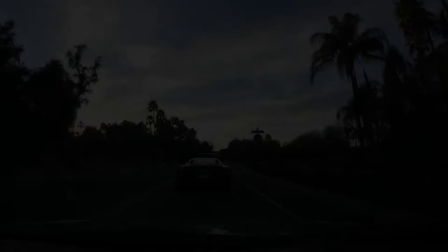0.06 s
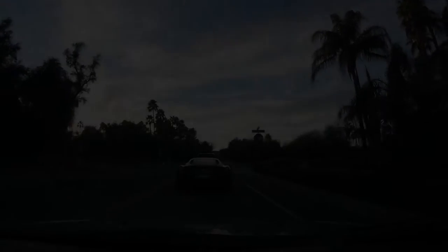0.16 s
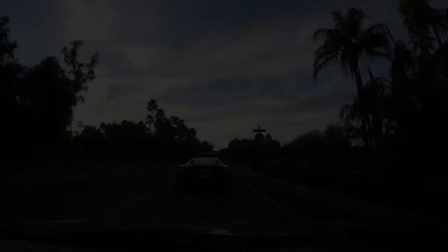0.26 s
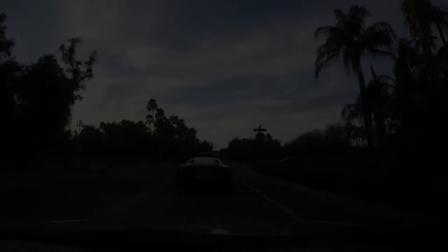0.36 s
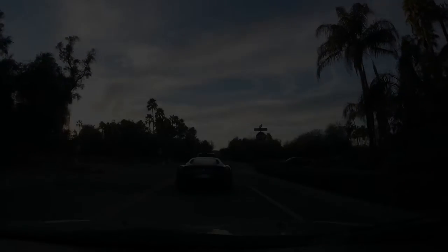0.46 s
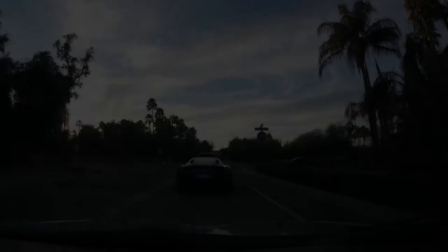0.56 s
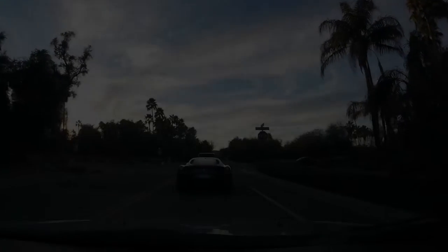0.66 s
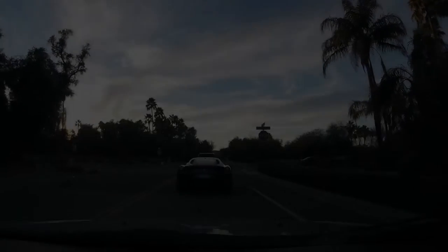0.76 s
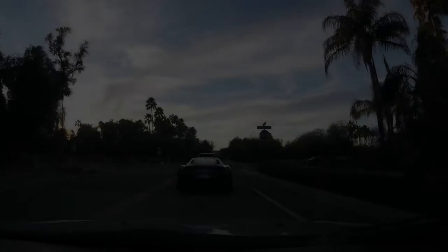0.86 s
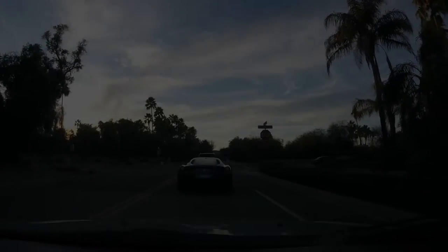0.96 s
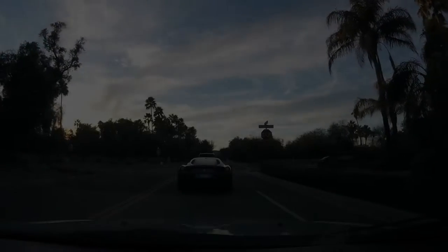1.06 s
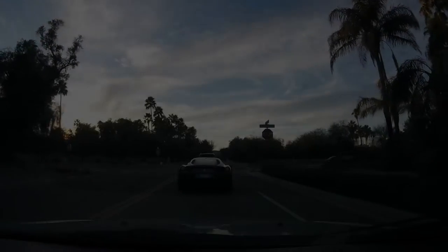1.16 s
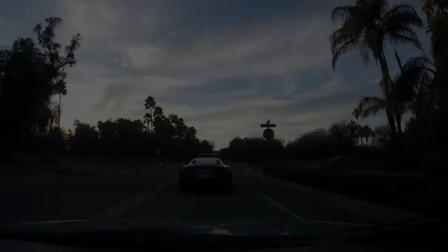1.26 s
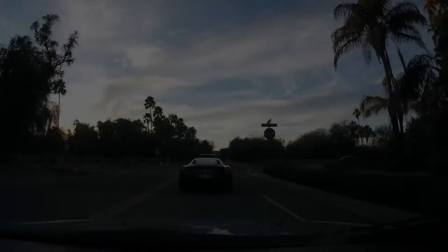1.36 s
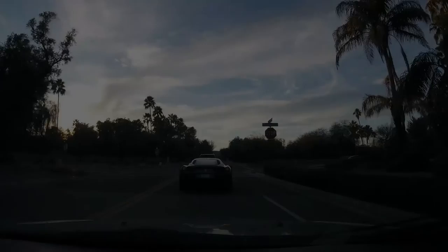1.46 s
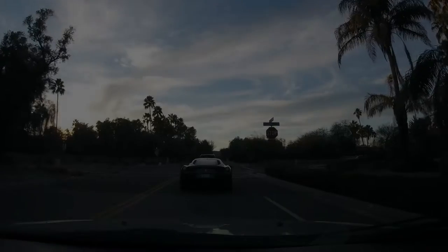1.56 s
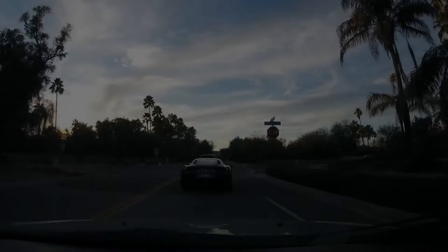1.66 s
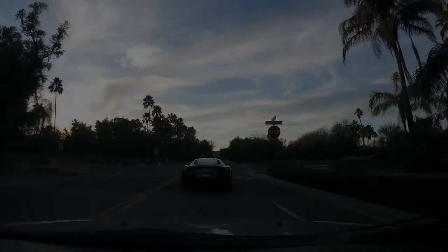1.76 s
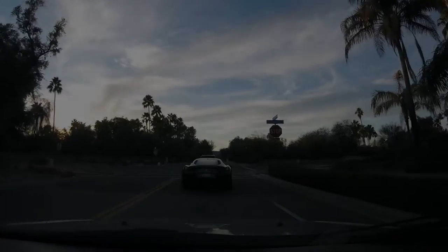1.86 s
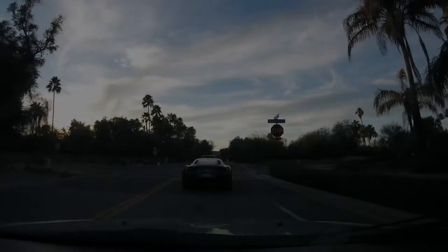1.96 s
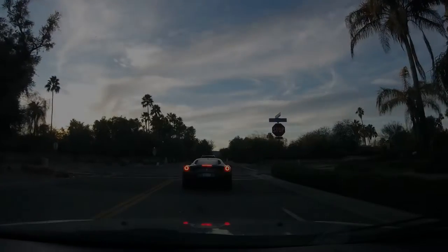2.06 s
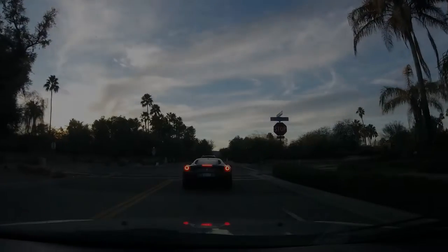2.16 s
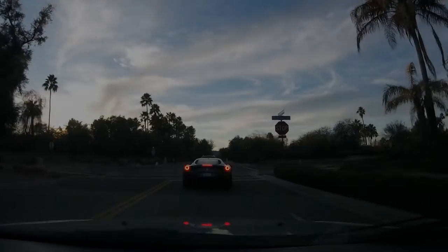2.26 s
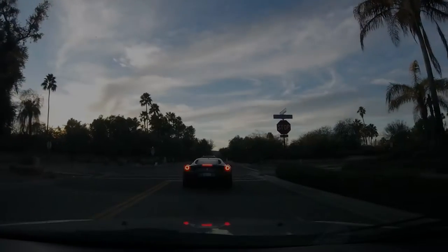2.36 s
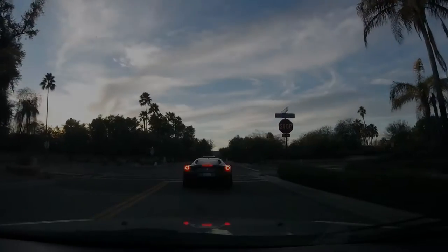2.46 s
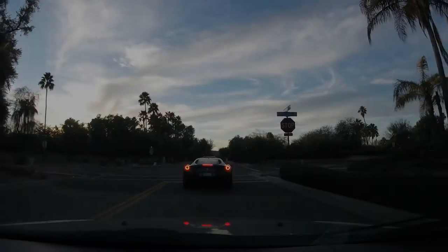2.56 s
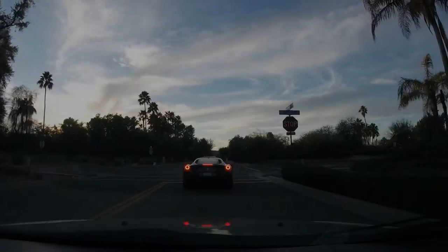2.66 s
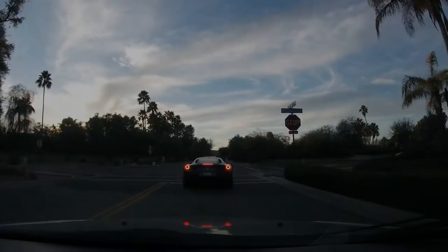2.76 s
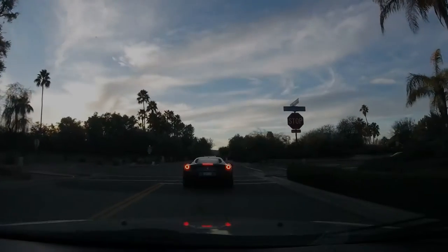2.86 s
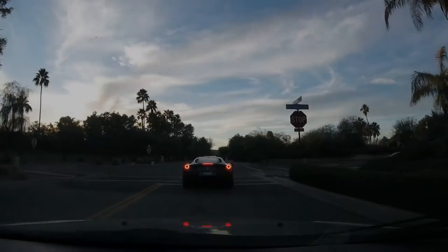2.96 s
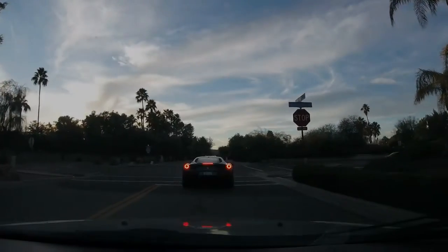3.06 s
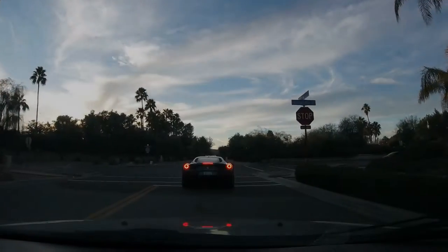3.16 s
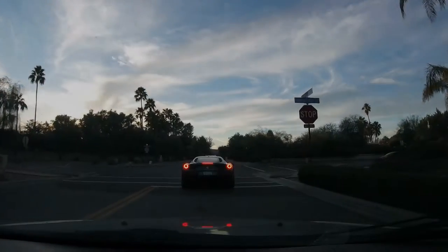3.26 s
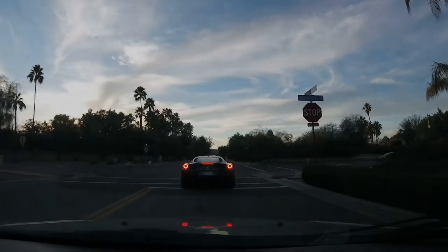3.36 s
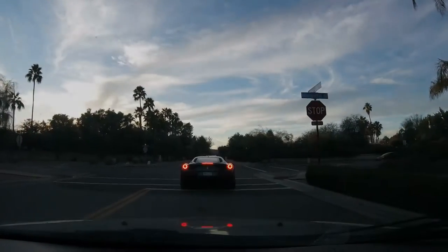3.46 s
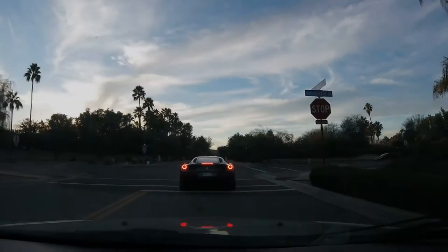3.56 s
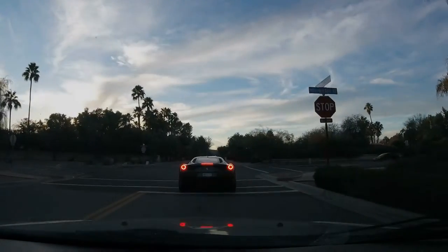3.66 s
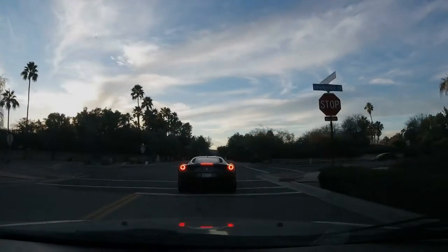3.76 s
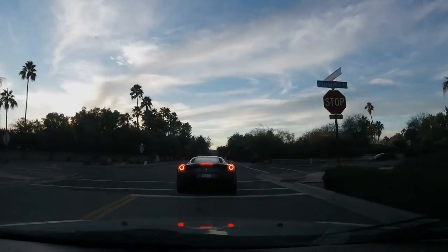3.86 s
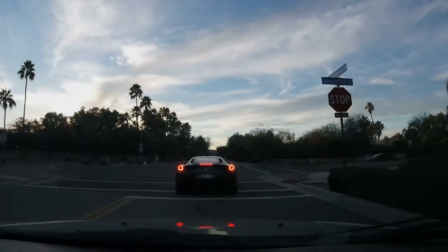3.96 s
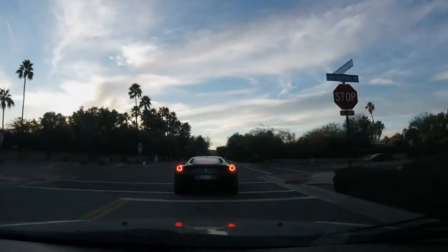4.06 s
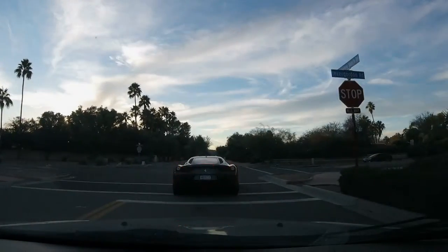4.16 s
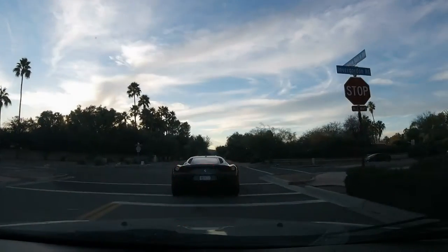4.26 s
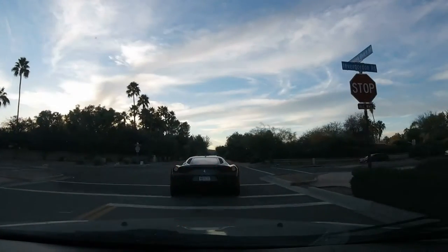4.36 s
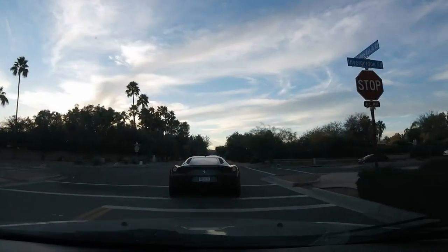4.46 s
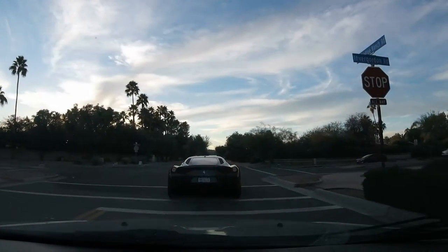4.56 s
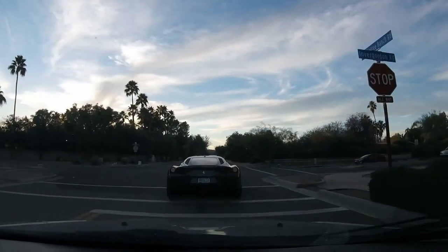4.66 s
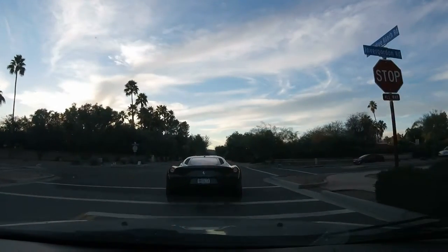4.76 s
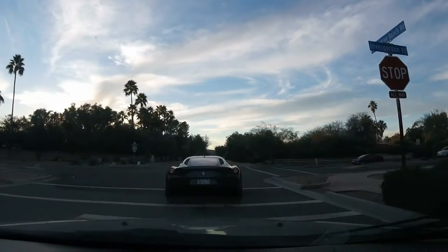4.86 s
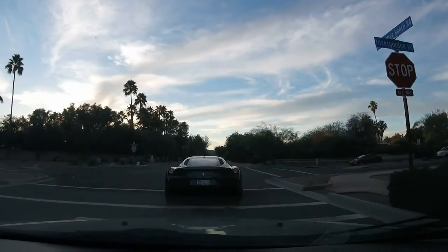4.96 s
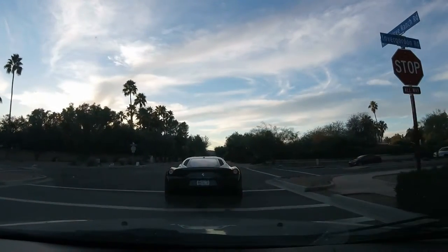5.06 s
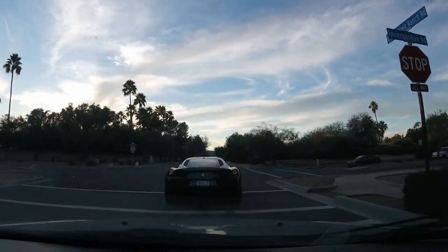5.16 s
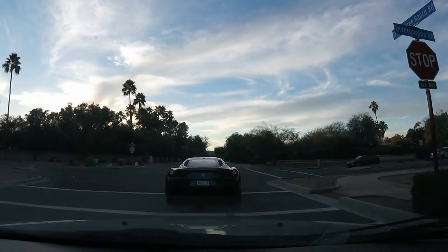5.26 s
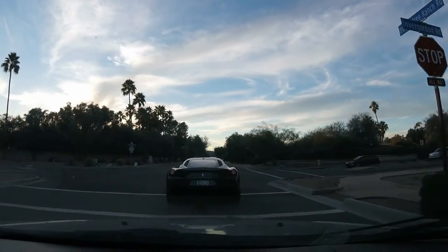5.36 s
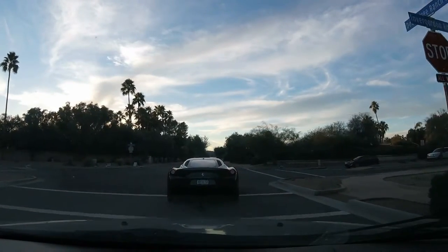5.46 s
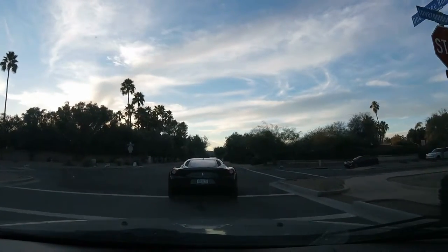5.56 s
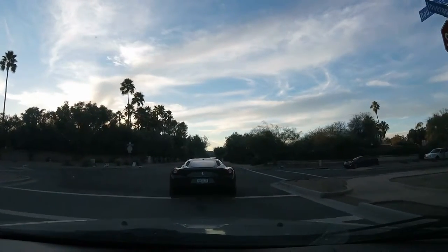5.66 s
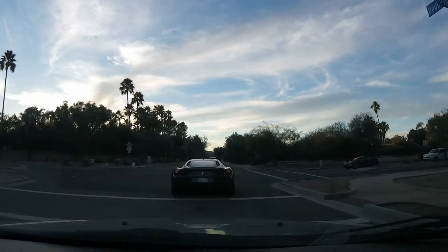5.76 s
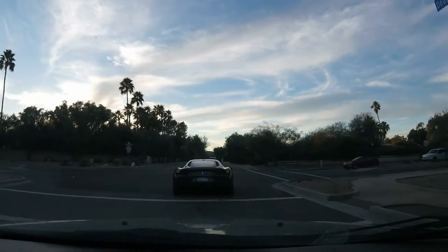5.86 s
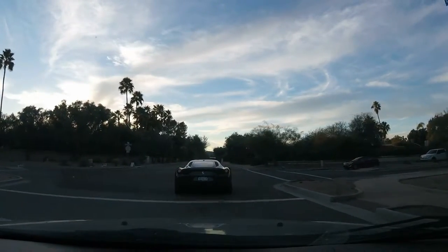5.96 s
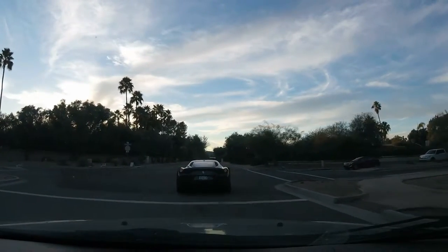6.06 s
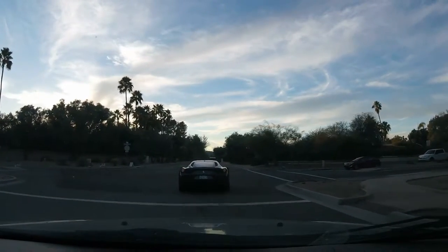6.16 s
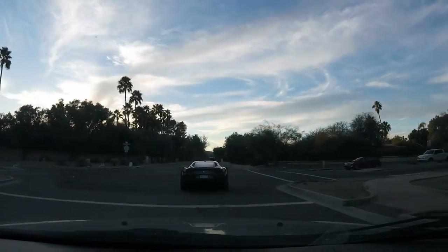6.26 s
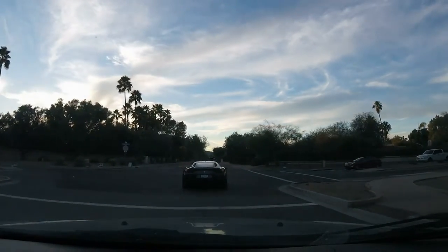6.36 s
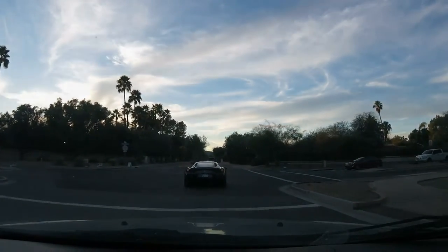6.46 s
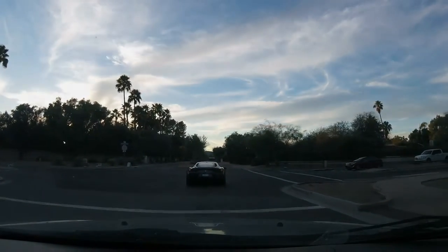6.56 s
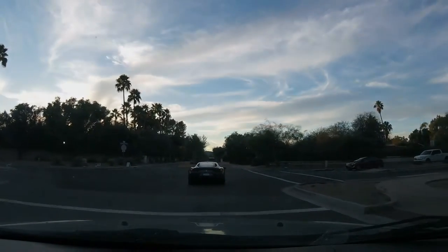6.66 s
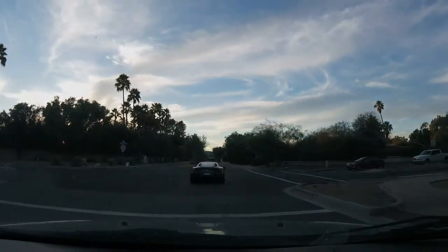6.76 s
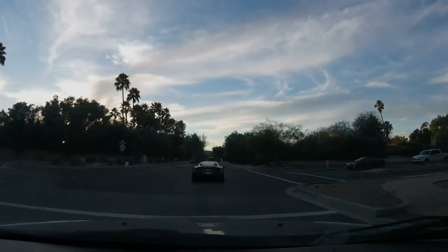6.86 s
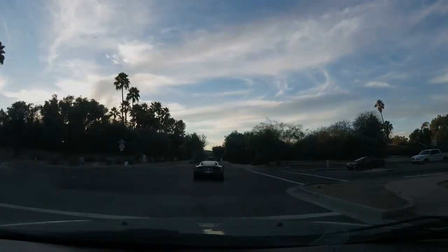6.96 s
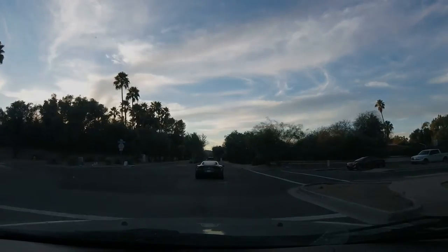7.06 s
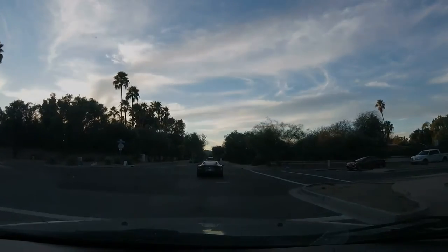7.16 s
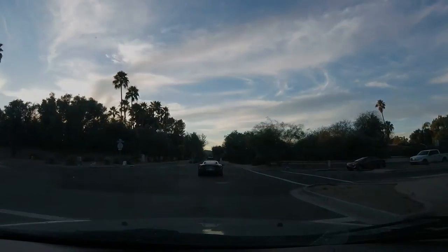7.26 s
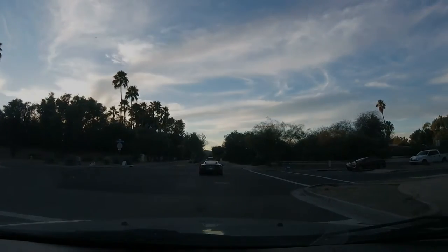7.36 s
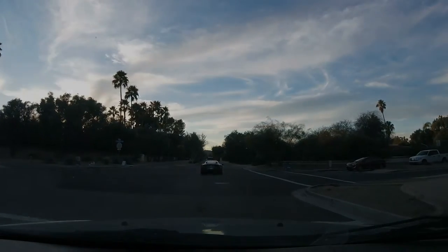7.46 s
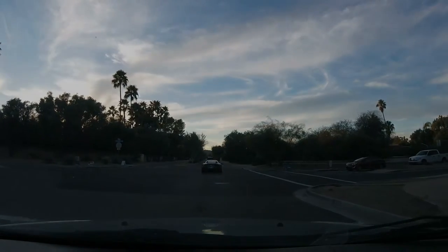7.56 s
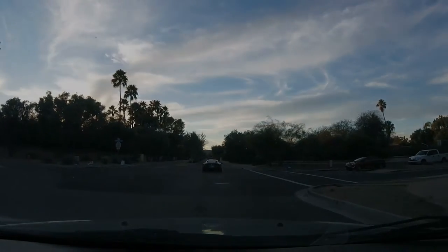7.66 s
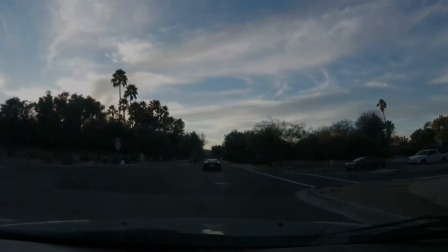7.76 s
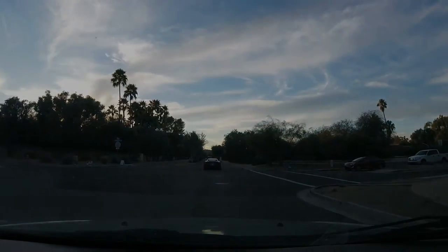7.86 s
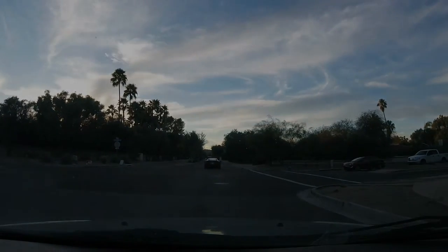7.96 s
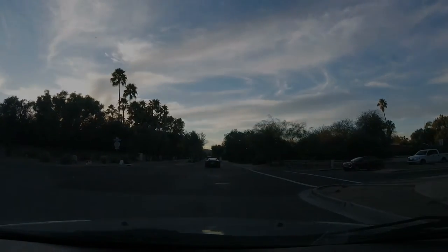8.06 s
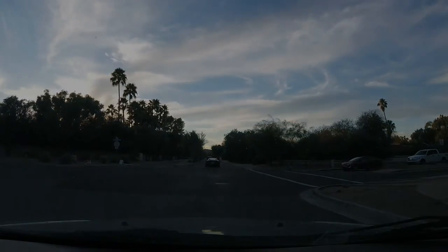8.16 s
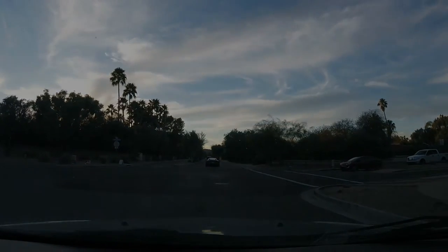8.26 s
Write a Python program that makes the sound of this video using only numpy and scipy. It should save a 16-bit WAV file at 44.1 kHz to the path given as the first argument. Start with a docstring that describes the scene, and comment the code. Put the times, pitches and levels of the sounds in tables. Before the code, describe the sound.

A cabin microphone picks up body shake, tyre roar and thin hiss beneath a throaty engine. It approaches a junction with a gentle rise, coasts down to a low idle, then accelerates hard after two small clicks. The growl sweeps up more than two octaves, with buzzing panels and brief resonant flares, eases for a moment late on, then pushes upward again.

```python
"""Sports car pulling away

From the cabin, a sports car rolls up to a junction, drops to idle and pulls away hard, easing once near the
end. Its eight-cylinder engine is a sum of sine orders of the cycle rate, coloured by resonances, with pulsed
gas noise. Filtered noise gives body shake, road rumble, tyre roar, a tyre rush at the start and a thin hiss.
Low sines boom, brief narrow tones chirp and flare, and two sharp ticks sound close together at about 5.1 s. The
whole fades in, and a gain control turns it down when it is loud."""
import sys
import numpy as np
from scipy import signal
from scipy.fft import rfft, irfft, next_fast_len
from scipy.io import wavfile
from scipy.ndimage import uniform_filter1d

SR = 44100
rng = np.random.default_rng(int(sys.argv[2]) if len(sys.argv) > 2 else 0)


def persist_wave(psi):
    """Save psi, clipped to +-1, as 16-bit WAV."""
    counts = np.round(np.clip(psi, -1, 1) * 32767).astype(np.int16)
    wavfile.write(sys.argv[1], SR, np.atleast_2d(counts).T)


N = 367353
TIME = np.arange(N) / SR

# nominal engine speed: t/s, firing rate f/Hz
SPEED = [(0, 83), (.25, 86), (.85, 98), (1.45, 116), (1.75, 124.5), (2.25, 122), (2.5, 116), (2.9, 100),
         (3.1, 88), (3.25, 83), (3.45, 72.5), (4.44, 70), (4.68, 102), (4.92, 114), (5.05, 115.5),
         (5.2, 130), (5.42, 138), (5.59, 136), (5.87, 175), (6.06, 198), (6.11, 212), (6.27, 245),
         (6.55, 294), (6.69, 316), (6.76, 321), (6.81, 337), (6.93, 355), (7.15, 385), (7.38, 411),
         (7.44, 382), (7.55, 343), (7.71, 330), (7.86, 338), (8.25, 393), (8.33, 396)]
# a touch of throttle, coasting to idle, the hard pull and one lift: t/s, load level/dB re reference load
THROTTLE = [(0, -18), (1.15, -22), (1.9, -7), (2.3, -12), (2.6, -22.5), (3.15, -19.5), (4.45, -19),
            (4.72, -12), (4.95, -2.5), (5.3, 2.5), (5.85, 3), (6.4, 4), (7.05, 1), (7.38, 2.5), (7.65, -1),
            (8.05, -3.5), (8.22, 2)]
# leading exhaust notes as multiples of the cycle rate: 4 is the note of one bank, 8 the firing note
LEADING_ORDERS = [4, 8, 12, 16, 20, 24, 32]


def from_db(db):
    """Logarithmic level: 20 dB is a factor of ten in amplitude."""
    return 10 ** (np.asarray(db) / 20)


def rms_one(x):
    """Normalisation: scale the signal to unit rms."""
    return x / np.sqrt(np.mean(x ** 2) + 1e-20)


def in_time(rows, t=TIME):
    """Linear interpolation: the columns of a curve at the times t."""
    s, *columns = np.transpose(rows)
    return [np.interp(t, s, column) for column in columns]


def at_hz(points, hz):
    """Spectral envelope: levels in dB interpolated along a log-frequency axis."""
    f, db = np.transpose(points)
    return np.interp(np.log(hz), np.log(f), db)


def drift(rate, t=TIME):
    """Slow random modulation: white noise through a double one-pole low-pass near rate in Hz; rms 1."""
    r = np.exp(-2 * np.pi * rate / 1000)  # drawn at 1000 values per second
    white = rng.standard_normal(10500)
    slow = signal.lfilter([1], [1, -2 * r, r * r], white)[2000:]  # the settling is dropped
    return np.interp(t * 1000, np.arange(len(slow)), rms_one(slow))


def resonance_db(hz):
    """Resonance: a component rises or dips as its frequency sweeps through each bell-shaped peak."""
    # broad resonances of the path into the cabin: f/Hz, width/Hz, level/dB
    broad_peaks = [(168, 63, 12), (305, 17, 7.5), (390, 38, 6.5), (558, 38, 9), (616, 42, 4),
                   (774, 12, 2.5), (930, 81, 4), (1340, 30, -3.5)]
    return sum(db / (1 + (2 * (hz - centre) / width) ** 2) for centre, width, db in broad_peaks)


def noise(spectrum, resonant=0):
    """Spectral shaping: white noise filtered to a colour, plus a share of the cabin's resonances; rms 1."""
    size = next_fast_len(N)
    hz = np.maximum(np.arange(size // 2 + 1) * SR / size, 1)
    gain = from_db(at_hz(spectrum, hz) + resonant * resonance_db(hz))
    white = rng.standard_normal(size)
    return rms_one(irfft(rfft(white) * gain, size)[:N])


def wavering(phase, rough, rate, t=TIME):
    """Random quadrature modulation: a sine whose height and phase wander."""
    in_phase = drift(rate, t) * np.sin(phase)
    quadrature = drift(rate, t) * np.cos(phase)
    return np.sin(phase) + rough * (in_phase + quadrature)


def narrow_tone(hz, width_hz):
    """Phase diffusion: a random walk in phase smears a tone over the given width; rms 1."""
    wander = np.cumsum(rng.standard_normal(N)) * np.sqrt(2 * np.pi * width_hz / SR)
    edges = [max(hz - 2 * width_hz, 50), hz + 2 * width_hz]
    band = signal.butter(2, edges, "band", fs=SR, output="sos")
    return rms_one(signal.sosfilt(band, np.sin(2 * np.pi * hz * TIME + wander)))


def swell(s, spread):
    """Gaussian envelope: a bell of standard deviation spread around the time s, both in seconds."""
    return np.exp(-.5 * np.minimum(np.abs(TIME - s) / spread, 10) ** 2)


def octaves():
    """Logarithmic pitch: engine speed in octaves above a middle firing rate of 135 Hz."""
    return np.log2(in_time(SPEED)[0] / 135)


def effort(db, load_share, db_per_octave):
    """Source power: the gain of an engine layer follows load and engine speed."""
    return from_db(db + load_share * in_time(THROTTLE)[0] + db_per_octave * octaves())


def crank(jitter):
    """Periodic excitation: rate and angle of the four-stroke cycle, which holds eight firings."""
    cycle_hz = in_time(SPEED)[0] / 8
    cycle_hz = cycle_hz * (1 + jitter * drift(18.0))
    return cycle_hz, 2 * np.pi * np.cumsum(cycle_hz) / SR


def exhaust(cycle_hz, angle, rough, firing_rough):
    """Harmonic series: four pulses a cycle from each bank and their overtones, each coloured by its own path."""
    # note of one bank: f/Hz, sine level/dB at 0 dB load
    bank_note = [(35, -32.5), (50, -31.5), (62, -38), (68, -46), (105, -45), (140, -24.5), (152, -29),
                 (178, -22.5), (190, -21.5), (203, -20), (215, -19.5)]
    # firing note: f/Hz, sine level/dB at 0 dB load
    firing_note = [(70, -20.5), (85, -11), (106, -13.5), (113, -9.5), (125, -3.5), (140, -3), (180, -5.5),
                   (195, -15), (212, -11.5), (245, -20), (280, -23), (314, -18.5), (376, -35.5), (400, -25),
                   (412, -28.5)]
    # three times the bank note: f/Hz, sine level/dB at 0 dB load
    third_note = [(105, -26.5), (140, -27.5), (162, -18), (184, -19), (198, -28), (255, -35.5),
                  (355, -43.5), (406, -32.5), (472, -44.5), (580, -47), (617, -36.5)]
    # octave of the firing note: f/Hz, sine level/dB at 0 dB load
    octave_note = [(140, -5), (173, 0), (205, -18), (218, -23), (228, -20), (242, -28), (263, -21.5),
                   (288, -31), (315, -20), (375, -32), (505, -55.5), (550, -31), (625, -39.5), (690, -55),
                   (728, -53), (750, -38.5), (780, -43.5), (824, -47.5)]
    # five times the bank note: f/Hz, sine level/dB at 0 dB load
    fifth_note = [(175, -18.5), (216, -36), (240, -31.5), (330, -39), (520, -63), (570, -55.5), (660, -44),
                  (760, -66.5), (900, -55), (985, -53)]
    # twelfth above the firing note: f/Hz, sine level/dB at 0 dB load
    twelfth_note = [(210, -33.5), (275, -31.5), (340, -25), (355, -36), (394, -32), (412, -45.5),
                    (510, -42.5), (640, -45), (700, -54.5), (760, -44), (820, -62), (1120, -47),
                    (1183, -49), (1236, -71)]
    # double octave of the firing note: f/Hz, sine level/dB at 0 dB load
    top_note = [(280, -38), (420, -37), (480, -45.5), (560, -48.5), (860, -59), (980, -40), (1060, -55.5),
                (1200, -60), (1320, -56.5), (1376, -52.5), (1440, -59.5), (1500, -55), (1648, -60)]
    colours = [bank_note, firing_note, third_note, octave_note, fifth_note, twelfth_note, top_note]

    strain = 0.15 * np.maximum(octaves(), 0)  # above mid speed the notes break up a little
    load_db = in_time(THROTTLE)[0]
    out = 0
    for k, colour in zip(LEADING_ORDERS, colours):
        load_share = 0.23 if k == 4 else 1  # the bank note hardly follows the throttle
        height = from_db(at_hz(colour, k * cycle_hz) + load_share * load_db)
        note_rough = firing_rough if k == 8 else rough
        phase = k * angle + rng.uniform(0, 2 * np.pi)
        out = out + height * wavering(phase, strain + note_rough, rate=11.3)
    return out


def growl(cycle_hz, angle, rough, flutter_rate, count=66):
    """Subharmonics: unequal cylinders sound the other multiples of the cycle, wavering as combustion varies."""
    # path from engine to cabin: f/Hz, sine level/dB
    cabin_path = [(30, -64), (100, -61.5), (150, -41.5), (195, -38), (245, -45.5), (320, -44), (400, -49.5),
                  (500, -58.5), (600, -60.5), (850, -68), (1120, -59.5), (1380, -65.5), (1640, -63.5),
                  (1800, -76.5), (2100, -80.5), (3300, -103.5)]
    # orders with a level of their own: multiple of the cycle rate, level offset/dB
    strong_orders = {2: -3, 3: -5, 5: -1, 6: -2, 7: 2, 9: 5, 10: 2, 11: 2, 14: 1, 17: -2, 18: 0, 19: -2, 22:
                     1, 28: 4, 36: 5, 40: 8, 44: 6, 48: 9, 56: 7, 64: 6}
    step = 5  # computed at every fifth sample, then resampled
    t, cycle_hz, angle = TIME[::step], cycle_hz[::step], angle[::step]
    out = 0
    for k in np.setdiff1d(np.arange(2, count), LEADING_ORDERS):
        line = wavering(k * angle + rng.uniform(0, 2 * np.pi), rough, flutter_rate, t)
        hz = k * cycle_hz
        line_db = at_hz(cabin_path, hz) + resonance_db(hz) + strong_orders.get(k, 0)
        out = out + line * from_db(line_db)
    gain = effort(db=-6, load_share=.6, db_per_octave=8.5)[::step]
    return signal.resample_poly(out * gain, step, 1)[:N]


def cabin_echoes(x, t60, wet_db):
    """Reverberation: dense decaying reflections make gliding orders beat against their own past."""
    t = TIME[:SR // 4]
    tail = rng.standard_normal(len(t)) * from_db(-60 * t / t60)
    wet = from_db(wet_db)
    reflected = signal.fftconvolve(x, tail / np.linalg.norm(tail))[:N]
    return (x + wet * reflected) / np.hypot(1, wet)


def rasp(angle, depth):
    """Amplitude-modulated flow noise: gas puffs out with each pulse of a bank."""
    # gas noise: f/Hz, spectral level/dB per Hz
    gas_spectrum = [(300, 1.5), (520, 9.5), (800, 5), (1500, -0.5), (2200, -7), (3100, 0.5), (4200, -8),
                    (5200, -17), (8000, -28.5), (14000, -55.5)]
    puffs = np.cos(4 * angle)
    idle_gain = from_db(-63)  # remains with the throttle shut
    gain = np.hypot(idle_gain, effort(db=-52, load_share=1.7, db_per_octave=0.24))
    return gain * rms_one(noise(gas_spectrum, resonant=1.0) * (1 + depth * puffs))


def panels(x):
    """Modal ringing: panels driven by the engine ring on at their own pitch and beat against it."""
    # panel modes: f/Hz, width/Hz, gain level/dB
    panel_modes = [(201, 2.3, -1), (398.6, 16, -5), (617.4, 11, 2), (751, 13, 4.5), (981, 8, 8.5),
                   (1197, 7.6, 5), (1380, 8.3, 8), (1615, 4.9, 4.5), (1820, 16, 2), (1980, 37, 2.5)]
    out = x
    for hz, width_hz, db in panel_modes:
        r = np.exp(-np.pi * width_hz / SR)
        band = signal.lfilter([1, 0, -1], [1, -2 * r * np.cos(2 * np.pi * hz / SR), r * r], x)
        out = out + from_db(db) * (1 - r * r) / 2 * band  # the factor brings the peak gain near 1
    return out


def whistle(patchy_db):
    """Flow-excited resonance: air drawn past the throttle sings fitfully, most around one engine speed."""
    detuned = (in_time(SPEED)[0] - 123) / 7  # distance from a 123 Hz firing rate, in units of 7 Hz
    gain = effort(db=-57.5, load_share=1.15, db_per_octave=-11) / np.hypot(1, detuned)
    return gain * from_db(patchy_db * drift(8.1)) * narrow_tone(hz=2795, width_hz=80)


def road(lumpy_db):
    """Broadband excitation: body shake, suspension rumble, varying tyre roar, tyre rush and air hiss."""
    # strength of the tyre roar in time: t/s, value (30 is the reference)
    roar_strength = [(0, 32), (1, 19.7), (2.3, 26), (3.2, 18.6), (4.5, 13.3), (5.3, 30), (6.5, 51),
                     (8.33, 22)]
    # rumble in time: t/s, level/dB
    rumble_level = [(0, -26), (3.3, -23.5), (4.8, -25.5), (6.2, -24.5), (6.65, -23), (7.2, -26.5),
                    (8.33, -31.5)]
    # noise colours, each: f/Hz, spectral level/dB per Hz
    shake_spectrum = [(10, -34), (18, -17.5), (23, 8.5), (26.5, 8.5), (30, 11.5), (38, -15), (100, -70)]
    rumble_spectrum = [(15, -18), (26, -7), (35, 3), (46, 3.5), (60, -5), (82, -3.5), (110, -8.5),
                       (175, -10), (240, -19.5), (340, -26.5), (440, -31.5), (560, -32.5), (720, -45),
                       (1200, -72.5)]
    roar_spectrum = [(200, -2), (500, -3.5), (720, 3), (1020, 3), (1500, -3), (2100, -9), (2800, -11),
                     (4000, -28.5), (6000, -34), (12000, -56.5)]
    rush_spectrum = [(400, -22.5), (530, -1), (660, -16.5), (800, -2.5), (920, -3.5), (1060, 4),
                     (1300, -5.5), (1800, -8.5), (2300, -24.5), (3400, -23.5), (6000, -42)]
    hiss_spectrum = [(1500, -4), (3500, -8), (5000, -18.5), (6000, -11), (6300, -4.5), (6520, 1),
                     (6850, -6), (8800, -10.5), (10300, -20.5), (12000, -18.5), (13300, -22.5),
                     (14500, -44.5)]

    doublings = np.log2(np.maximum(in_time(roar_strength)[0], 1) / 30)
    since = TIME - 0.27  # seconds from the peak of the rush
    rush_db = -40 + np.minimum(21 * since, -14 * since) + 1.5 * drift(4.9)  # rises and falls in dB/s
    shake_db = -31.5 + 1 * np.maximum(TIME - 5.1, 0)  # grows by 1 dB/s from 5.1 s
    shake = from_db(shake_db) * noise(shake_spectrum)
    rumble = from_db(in_time(rumble_level)[0]) * noise(rumble_spectrum)
    roar_db = -48 + 7 * doublings + lumpy_db * drift(14)  # 7 dB per doubling of strength
    roar = from_db(roar_db) * noise(roar_spectrum, resonant=0.18)
    rush = from_db(rush_db) * noise(rush_spectrum, resonant=0.28)
    hiss = from_db(-61.5) * noise(hiss_spectrum)
    return shake + rumble + roar + rush + hiss


def chirps():
    """Narrow-band bursts: short swelling tones and scuffs in the cabin, and the flares of its panels."""
    # chirps, hums and scuffs: t/s, envelope spread/s, f/Hz, width/Hz, level/dB
    cabin_bursts = [(.14, .06, 800, 95, -43.5), (.36, 0.11, 1847, 280, -49.5),
                    (0.557, 0.089, 1035, 65, -50), (3.36, .008, 5650, 500, -65),
                    (5.165, .015, 3340, 86, -58), (5.905, 0.02, 2680, 160, -50),
                    (6.302, 0.24, 4160, 210, -64), (7.55, .26, 198.5, 8, -29.5)]
    # panel flares during the pull: t/s, envelope spread/s, f/Hz, width/Hz, level/dB
    panel_flares = [(6.3, .036, 982, 5, -39), (7.553, .025, 1381, 8, -41), (7.45, .025, 752, 6, -41),
                    (8.17, .04, 754, 5, -40), (8.26, .045, 1187, 6, -42), (8.27, .06, 984, 6, -42)]
    out = 0
    for s, spread, hz, width, db in cabin_bursts + panel_flares:
        out = out + from_db(db) * swell(s, spread) * narrow_tone(hz, width)
    return out


def boom(rough):
    """Low-frequency body drone: enveloped sines swell mostly during the approach, and once in the pull."""
    # swells: t/s, envelope spread/s, f/Hz, level/dB
    boom_swells = [(1.112, 0.053, 49, -22), (1.648, 0.084, 42.6, -18), (2.182, 0.32, 49.34, -18.5),
                   (2.757, 0.11, 48.24, -19), (3.448, 0.17, 41.1, -21), (3.494, .2, 57, -27),
                   (6.546, 0.029, 41, -30)]
    drone = 0
    for s, spread, hz, db in boom_swells:
        drone = drone + from_db(db) * swell(s, spread) * rms_one(np.sin(2 * np.pi * hz * TIME))
    return drone * (1 + rough * drift(2.5))


def ticks(dull_hz):
    """Overdamped impulse response: a sudden jump that dies away without ringing."""
    # ticks: t/s, impulse level/dB
    tick_rows = [(5.0939, -17), (5.127, -25.5)]
    clicks = np.zeros(N)
    for s, db in tick_rows:
        clicks[round(s * SR)] = from_db(db)
    low_pass = signal.butter(2, 8000, fs=SR, output="sos")
    rounded = signal.sosfilt(low_pass, clicks + 1e-18)
    return signal.lfilter([1], [1, -np.exp(-2 * np.pi * dull_hz / SR)], rounded)


def throat(angle, depth):
    """Pulsed flow noise: halfway up the pull, low gas noise briefly fills in between the orders."""
    # throaty exhaust noise: f/Hz, spectral level/dB per Hz
    throat_spectrum = [(70, -31), (130, -5.5), (185, -0.5), (260, -4.5), (330, -6.5), (410, -4), (470, -11),
                       (530, -21), (900, -50), (3000, -85.5)]
    puffs = np.cos(4 * angle)
    gain = from_db(-25.5) * swell(s=6.32, spread=0.19)
    return gain * rms_one(noise(throat_spectrum) * (1 + depth * puffs))


def gain_control(x):
    """Dynamic compression: rms above a limit pushes the gain down, and it recovers very slowly."""
    limit_db, recover_db_per_s, detect_s = -8, 0.6, 0.31
    power = uniform_filter1d(x[0] ** 2, int(detect_s * SR))
    level_db = 10 * np.log10(np.maximum(power, 1e-12))
    recovered = recover_db_per_s * TIME
    excess_db = np.maximum(level_db - limit_db, 0)
    return x * from_db(recovered - np.maximum.accumulate(excess_db + recovered))


def scene():
    """Superposition: engine, intake, road, brief tones and two sharp ticks add linearly."""
    cycle_hz, angle = crank(jitter=0.0011)
    notes = exhaust(cycle_hz, angle, rough=0.24, firing_rough=0.09)
    overtones = cabin_echoes(growl(cycle_hz, angle, rough=.5, flutter_rate=6), t60=.3, wet_db=-3)
    gas = rasp(angle, depth=0.21) + throat(angle, depth=0.16)
    engine = panels(notes + from_db(-4.5) * overtones + gas)
    intake = whistle(patchy_db=3)
    rolling = road(lumpy_db=1.06) + boom(rough=0.073)
    return (engine + intake + rolling + chirps() + ticks(dull_hz=250))[None]


def record(dry):
    """Band limiting: after gain control and a slow fade-in, the top is cut steeply at 13.8 kHz."""
    fade = np.interp(TIME, [0, 3.87], [0.17, 1])  # seconds, gain
    low_pass = signal.ellip(10, .1, 80, 13800, fs=SR, output="sos")
    return signal.sosfilt(low_pass, fade * gain_control(dry))


dry = scene()
out = record(dry)
persist_wave(out)
```